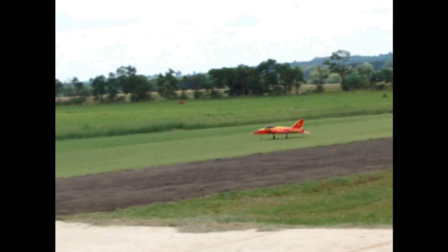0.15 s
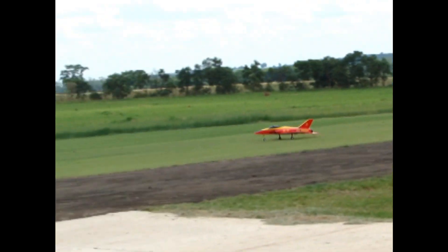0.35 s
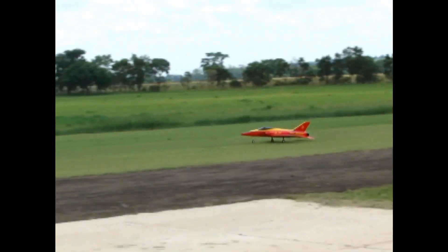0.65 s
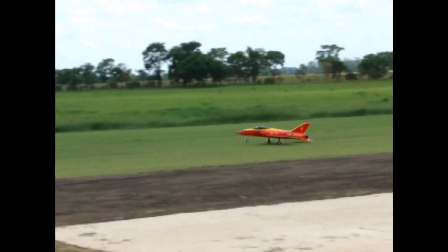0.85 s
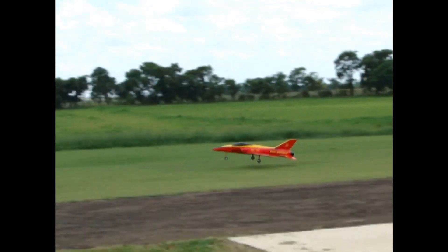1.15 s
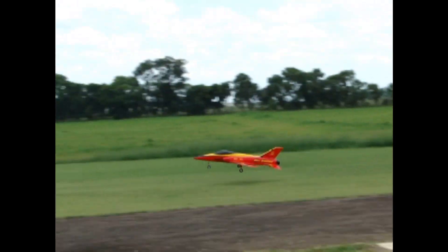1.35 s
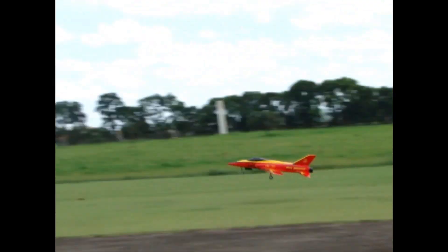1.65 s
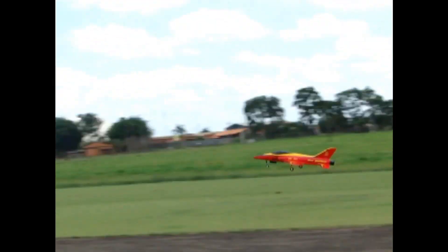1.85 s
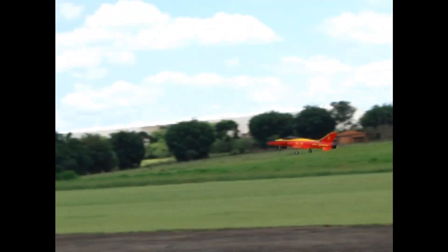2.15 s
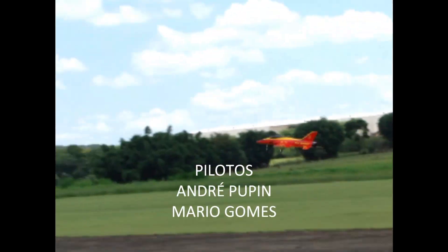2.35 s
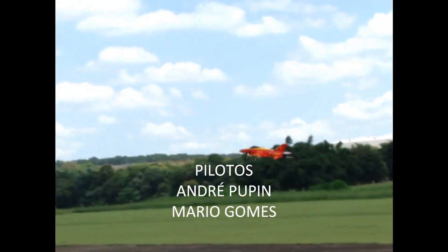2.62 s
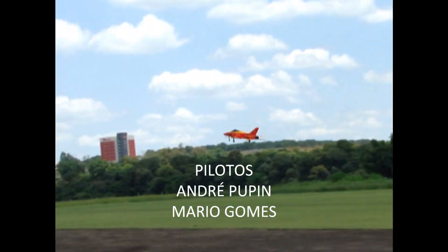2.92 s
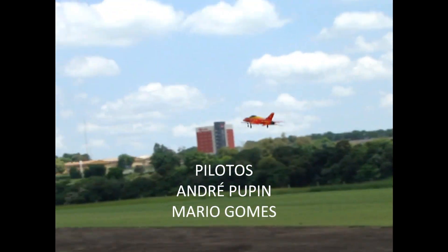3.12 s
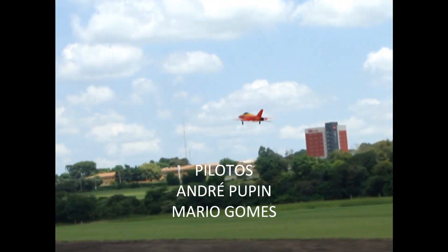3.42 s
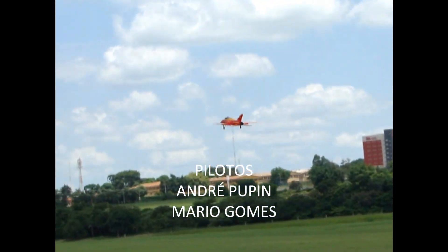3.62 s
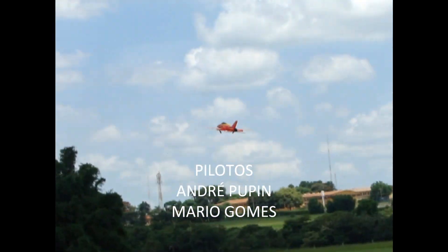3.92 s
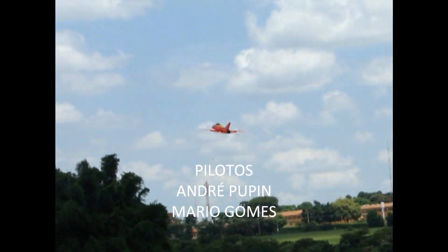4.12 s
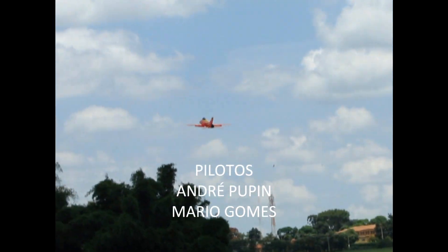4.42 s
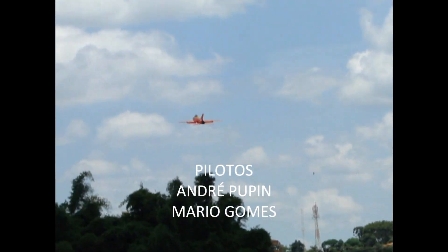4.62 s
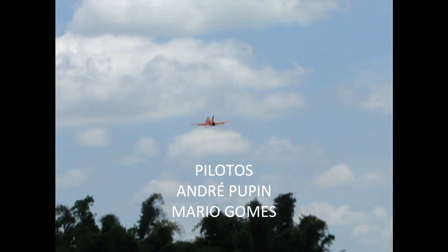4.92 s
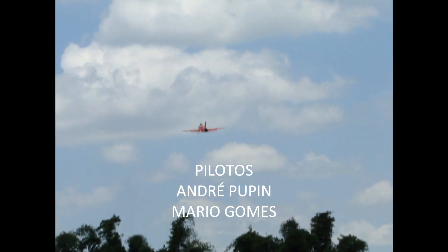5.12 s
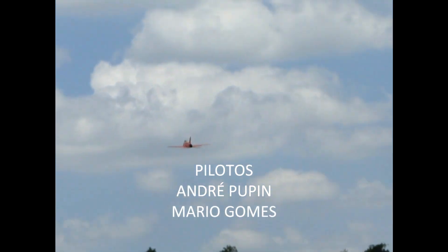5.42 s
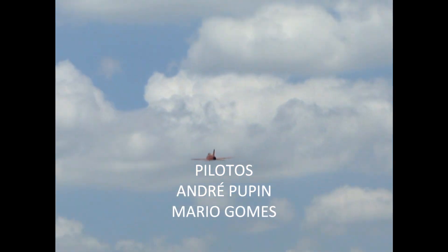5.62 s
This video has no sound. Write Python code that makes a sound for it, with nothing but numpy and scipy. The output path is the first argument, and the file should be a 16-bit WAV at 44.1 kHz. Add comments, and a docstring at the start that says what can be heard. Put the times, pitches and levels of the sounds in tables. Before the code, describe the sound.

A six-second outdoor flyby of a small model turbine jet, heard by a stereo microphone near a grass airstrip. From 0 to about 1 s, strong low wind flutters and thumps unevenly on the two sides, with short sharp puffs, over a restrained jet rush and a faint, very high whistle near 11.5 kHz, sliding slightly down. Around 1.1 s the whistle flares with tiny sizzles and the exhaust opens up: a surge of roar, midrange rush and bright hiss, passing closest near 1.5 s. The whistle is gone by about 1.5 s and the wind eases to a light breeze. From 2 to 4 s the broad, airy, flickering rush continues, coloured by shifting hollow, flanger-like sweeps from echoes. After 4 s it recedes, the top treble softening; from about 4.8 s a rough rumble around 500 Hz gathers and sinks, with small wind gusts after 5 s.

```python
"""On a grass strip, a model jet lifts off, passes a microphone pair some twenty metres away and climbs off.
Its exhaust is shaped noise that roars, rushes and hisses; the turbine's blade tone whistles on the approach,
with short sizzles of intake noise. Delayed copies off the grass and nearby surfaces sweep combs through
the jet, and a rumble gathers behind it. Low noise, mostly opposite at the two ports, is wind: strong at first,
then a light breeze with gusts near the end."""
import sys
import numpy as np
from scipy import signal
from scipy.io import wavfile
from scipy.ndimage import uniform_filter1d, map_coordinates

SR = 44100
rng = np.random.default_rng(int(sys.argv[2]) if len(sys.argv) > 2 else 0)


def int16_out(signal):
    """Quantize to a 16-bit WAV file."""
    q = np.round(np.clip(np.atleast_2d(signal).T, -1, 1) * 32767)
    wavfile.write(sys.argv[1], SR, q.astype(np.int16))


N = 254016
TIME = np.arange(N) / SR
# the noise is coloured in overlapping spectral frames, one every 256 samples
FRAME_S = np.arange(N // 256 + 5) * 256 / SR
BIN_HZ = np.fft.rfftfreq(1024, 1 / SR)

# colour of wind on the ports, before its pitch is scaled: (frequency [Hz], relative level [dB per Hz])
WIND_COLOUR = [(20, -56), (45, -35), (90, -23), (160, -2.5), (250, 4.5), (420, -0.5), (560, -8.5),
               (800, -17), (1200, -16.5), (2000, -46), (4000, -70)]


def exhaust():
    """Large eddies roar, the core of the stream rushes, the fine eddies at the nozzle hiss."""
    wander_db = 0.21 * drift(TIME, 2.02, 6)
    return roar() + (rush() + hiss()) * gain_of(wander_db)


def rush():
    """The core of the jet stream: mid-band turbulence that shifts in pitch and narrows in its strongest lobe."""
    # colour before the pitch factor: (frequency [Hz], from the side [dB per Hz], from behind [dB per Hz])
    rush_colour = [(490, -58, -75), (687, -17, -17.5), (870, -7, -4.5), (965, -6, -3), (1060, 2.1, 2),
                   (1377, 2.5, -3.5), (1524, -0.5, -14), (1620, -8, -13), (1980, -4, -11),
                   (2280, -6.5, -13.5), (2600, -5.5, -20), (2930, -5.5, -19), (3030, -9.5, -15),
                   (3070, -8.5, -21.5), (3220, -14, -21.5), (4870, -38, -47.5)]
    # wavering pitch of the rush, highest near 1.25 s: (time [s], pitch [factor])
    rush_pitch = [(0, 0.95), (.7, 0.92), (1.25, 0.99), (1.7, 0.95), (2.3, 0.96), (3, 0.93), (3.7, 0.955),
                  (4.5, 0.93), (5.76, 0.94)]
    # brightness as the plane turns: (time [s], tilt [dB per octave])
    rush_tilt = [(.6, 1), (1.05, 0.8), (1.3, 2), (1.6, 4.5), (1.9, 0.1), (2.25, 0.6), (2.8, 1.3), (3.3, -2),
                 (4, 0.1), (5.76, 3)]
    pitch, = curves(rush_pitch, FRAME_S[:, None])
    slope, = curves(rush_tilt, FRAME_S[:, None])
    # in the lobe the colour gains contrast
    focus = 1 + 0.23 * bump(FRAME_S[:, None], 2.42, 0.35)
    noise = jet_noise(rush_colour, BIN_HZ / pitch, turning(2.6, 4.3), patchy_db=1.2, flutter_db=0.25,
                      tilt_db=slope * np.log2(BIN_HZ + 1), contrast=focus)
    level_db = jet_level_db(abeam_db=-23, hidden_db=-8, tail_db=-5.5, beam_db=6)
    # extra flutter while the plane rolls, then a surge as the nozzle comes into view
    rolling_db = 1.2 * (1 - ramp(TIME, 0.85, 1.15)) * drift(TIME, 12, 70)
    surge_db = 1.2 * bump(TIME, 1.14, 0.052)
    return noise * gain_of(level_db + rolling_db + surge_db)


def hiss():
    """Fine eddies at the nozzle: treble turbulence, brighter or duller as the plane turns."""
    # colour: (frequency [Hz], from the side [dB per Hz], from behind [dB per Hz])
    hiss_colour = [(2360, -60, -54), (3150, -4.5, -0.5), (3450, -0.5, -1), (3770, 0.5, 1.8),
                   (4430, -5.5, -1), (4770, -3, -3), (5750, -2.5, -3.5), (6100, -0.2, -4), (6610, -9, -4.5),
                   (7280, -9, -11), (7670, -3, -12), (8170, -7, -9.5), (8750, -7, -14), (9250, -8, -10.5),
                   (9970, -3, -10.5), (10800, -11.5, -13.5), (11280, -15, -15.5), (12300, -19, -25),
                   (13300, -60, -60)]
    # brightness: (time [s], tilt [dB per octave])
    hiss_tilt = [(.6, -5.5), (1.1, -1.5), (1.6, -2.5), (2.2, 1.5), (2.65, -0.5), (4, 2), (4.9, 2.5),
                 (5.76, 0.5)]
    # brief swells and sags: (time [s], width [s], change [dB])
    swells = [(0.085, .07, 6), (.37, 0.082, 1.5), (1.125, .025, 3), (1.266, .03, 1), (1.47, 0.12, 2.3),
              (1.702, 0.03, 1.2), (1.872, 0.036, -2), (2.276, 0.43, 1.7), (3.508, .03, -1.8),
              (3.64, 0.04, 1.8), (3.946, .1, 1), (5.0, 0.21, 1.5)]
    slope, = curves(hiss_tilt, FRAME_S[:, None])
    noise = jet_noise(hiss_colour, BIN_HZ, turning(1.7, 3.66), patchy_db=1.42, flutter_db=0.86,
                      tilt_db=slope * np.log2(BIN_HZ + 1) + treble_db())
    level_db = jet_level_db(abeam_db=-27, hidden_db=-12, tail_db=-4.5, beam_db=2)
    return noise * gain_of(level_db + summed_db(swells))


def roar():
    """The large, slow eddies of the jet: low-pitched turbulence."""
    # colour: (frequency [Hz], from the side [dB per Hz], from behind [dB per Hz])
    roar_colour = [(20, -66, -57), (103, -24, -25), (170.5, -9, -14), (303, 1, 0), (364, 2, -3.5),
                   (516, 3.5, 3), (636, -5, -1.5), (830, -7.5, -4.5), (1230, -20, -55)]
    noise = jet_noise(roar_colour, BIN_HZ, turning(3.45, 4.9), patchy_db=0.4, flutter_db=0.5)
    return noise * gain_of(roar_level_db())


def roar_level_db():
    """The roar swells on the runway, hollows out as the plane lifts, fills again and grows behind the nozzle."""
    runway_db = 6.5 * bump(TIME, 1.14, 0.17)
    hollow_db = -8.5 * (ramp(TIME, 1.12, 1.83) - ramp(TIME, 2.36, 3.1))
    behind_db = 4.5 * ramp(TIME, 4.3, 4.9)
    return -34.5 + runway_db + hollow_db + behind_db


def jet_level_db(abeam_db, hidden_db, tail_db, beam_db):
    """Spreading loss with distance, plus hiding by the fuselage, the rearward beam and the quiet core tail-on."""
    # a straight, accelerating run past the microphone
    abeam_s, closest_m, speed_m_per_s, thrust_m_per_s2 = 1.45, 21.5, 19.1, 7.8
    t = TIME - abeam_s
    along_m = speed_m_per_s * t + .5 * thrust_m_per_s2 * t ** 2
    distance = np.hypot(along_m, closest_m) / closest_m  # 1 at the closest point
    hidden = 1 - ramp(TIME, 0.52, 1.25) ** 1.8  # the nozzle swings into view
    tail_on = ramp(TIME, 4.85, 5.93)
    # once past, the beam gains beam_db for each doubling of distance
    rearward_db = beam_db * np.log2(distance) * (t > 0)
    aimed_db = hidden_db * hidden + tail_db * tail_on + rearward_db
    return abeam_db - 20 * np.log10(distance) + aimed_db


def jet_noise(colours, hz, aft, patchy_db, flutter_db, tilt_db=0, contrast=1):
    """Turbulent noise that changes colour as the tail turns to the listener; uneven air makes it flutter."""
    # the microphone pair with the plane near and far:
    # (frequency [Hz], left over right [dB], coherence [0-1], left lead [rad])
    ports_near = [(150, 0.0, 0.9, 0.0), (400, -0.3, 0.92, 0.0), (700, -0.3, 0.7, 0.2),
                  (1050, 4.2, 0.94, 0.1), (1600, 1.8, 0.81, -0.3), (1800, 4.5, 0.27, 0.4),
                  (2080, 9.5, 0.5, -1.8), (2500, -3, 0.67, -2.1), (3300, -5.5, 0.72, -2.9),
                  (4300, -2, 0.25, -2.4), (5000, -4.5, 0.68, -0.5), (6100, -7, 0.67, -0.8),
                  (7000, -4.5, 0.4, -3.3), (7800, -8, 0.45, -3.9), (8700, -0.5, 0.55, -4.7),
                  (9200, 1, 0.45, -4.5), (9800, 10, 0.4, -1.6), (10700, 7, 0.6, -2), (11400, 0, 0.65, -1.4)]
    ports_far = [(150, 0.0, 0.9, 0.0), (400, -0.6, 0.92, 0.2), (700, 3.5, 0.85, 0.5),
                 (1050, 4.8, 0.95, 0.2), (1500, 5.7, 0.7, 0.2), (1800, 7.4, 0.81, 0.5),
                 (2080, 11.8, 0.36, 0.6), (2500, 4.5, 0.42, -3.3), (3300, 3, 0.55, -3.7),
                 (4200, -0.5, 0.7, -4.1), (5000, -4, 0.37, 0.3), (6100, -7.5, 0.38, 0.1),
                 (6700, -6, 0.45, -2.7), (7300, 1.5, 0.5, -3.9), (7700, 0, 0.45, -3.6),
                 (8200, -5.5, 0.48, -3.7), (8700, -1.5, 0.55, -4), (9200, 1, 0.5, -4.3),
                 (9800, 8.5, 0.35, -2.3), (10700, 9, 0.35, -1.3), (11400, 6, 0.3, -1.5)]
    side, behind = spectra(colours, hz)
    colour_db = contrast * ((1 - aft) * side + aft * behind) + tilt_db + ground_db()
    colour_db = colour_db + patchy_db * patches(frame_size=14, bin_size=12)
    far = turning(1.8, 3.73)
    ports = (1 - far) * spectra(ports_near, BIN_HZ)[:, None] + far * spectra(ports_far, BIN_HZ)[:, None]
    return noise_pair(colour_db, *ports) * gain_of(flutter_db * drift(TIME, 5, 35))


def treble_db():
    """The air dulls the top of the hiss as the plane draws away, and one band of it wavers."""
    # relative level of the band around 3.8 kHz: (time [s], change [dB])
    band_level = [(1.9, -5), (2.3, -1.5), (3, -2.5), (3.4, -1.5), (3.75, -1), (4.15, 1.5), (4.5, -4.5),
                  (5.76, -5)]
    t = FRAME_S[:, None]
    # from 3.8 s the loss grows by 3 dB a second at 10 kHz, and as frequency squared
    air_db = -3 * np.maximum(t - 3.8, 0) * (BIN_HZ / 10000) ** 2
    return air_db + curves(band_level, t)[0] * bump(BIN_HZ, 3800, 330)


def ground_db():
    """The grass turns the sound over as it bounces: a comb whose higher notches blur."""
    # the bounce falls behind as the plane climbs, and strengthens late, as the plane climbs away
    lag_ms = 0.12 + 0.77 * np.maximum(FRAME_S[:, None] - 1.808, 0)
    strength = np.minimum(0.24 + (0.87 - 0.24) * turning(3.9, 5.3), 0.85)
    cycles = BIN_HZ * lag_ms / 1000
    bounce = strength * np.exp(-(cycles / 1.26) ** 2)  # the blur sets in around 1.26 cycles of lag
    return 20 * np.log10(abs(1 - bounce * np.exp(-2j * np.pi * cycles)))


def reflections(x):
    """Two rough, dull echoes off surfaces; their lags shrink as the plane draws away and sweep a comb."""
    # each echo, before the facet shares: (time [s], lag [ms], level [dB])
    first_echo = [(0, 7, -30), (1.1, 9.5, -24), (1.5, 9.95, -13), (2.1, 9.4, -22), (3, 7.25, -16),
                  (3.7, 6.2, -9.5), (4.4, 5.2, -11), (5, 4.6, -14), (5.76, 4.2, -10)]
    second_echo = [(2.6, 9.2, -32), (3.2, 8.2, -16), (3.5, 7.65, -12), (3.9, 7.1, -18), (5, 6.2, -17),
                   (5.76, 5.8, -24)]
    # facets of each surface, some turning the sound over: (extra lag [ms], signed share [factor])
    facets = [(-.28, -.35), (0, .95), (.3, -.6), (.85, .3)]
    dull = signal.sosfiltfilt(signal.butter(1, 4800, fs=SR, output="sos"), x)
    out, power = x.copy(), 1
    for echo in (first_echo, second_echo):
        lag_ms, db = curves(echo, TIME)
        power = power + gain_of(db) ** 2
        for extra_ms, share in facets:
            heard_from = TIME - (lag_ms + extra_ms) / 1000
            out += share * gain_of(db) * np.array([np.interp(heard_from, TIME, port) for port in dull])
    return out / np.sqrt(power)


def near_echo(x):
    """A small surface beside the microphone throws the treble back, turned over: each port has its own comb."""
    # lag of the echo: (time [s], left port [ms], right port [ms])
    near_lags = [(2, 1.185, 1.125), (2.7, 1.217, 1.122), (3.4, 1.25, 1.138), (5.76, 1.255, 1.136)]
    # share of the treble thrown back: (time [s], left port [factor], right port [factor])
    near_shares = [(1.7, .03, .06), (2.2, .2, .32), (2.8, .2, .2), (3.4, .2, .14), (3.9, .07, .14),
                   (4.5, .18, .24), (5.76, .12, .26)]
    treble = signal.sosfiltfilt(signal.butter(2, 2100, "high", fs=SR, output="sos"), x)
    heard_from = (TIME - np.array(curves(near_lags, TIME)) / 1000) * SR  # in samples
    thrown_back = np.array([map_coordinates(port, [when], order=3) for port, when in zip(treble, heard_from)])
    return x - np.array(curves(near_shares, TIME)) * thrown_back


def rumble():
    """Heard from behind, the low noise gathers into one rough band that sinks in pitch."""
    # the departing rumble: (time [s], pitch [Hz], level before roughness [dB])
    rumble_path = [(4.3, 560, -70), (4.75, 540, -42), (5.15, 527, -33), (5.45, 490, -34.5),
                   (5.76, 442, -37)]
    hz, _ = curves(rumble_path, FRAME_S[:, None])
    _, level_db = curves(rumble_path, TIME)
    colour_db = -20 * np.log10(1 + ((BIN_HZ - hz) / 58) ** 2)  # 6 dB down 58 Hz off centre
    rough_db = 1.2 * drift(TIME, 19, 70)
    return noise_pair(colour_db, balance_db=-3, coherence=1.0, lead=0.25) * gain_of(level_db + rough_db)


def whistle():
    """The compressor's blade tone beams from the intake in a narrow fuzz of inflow noise, then fades steeply."""
    # centre of the wavering blade tone: (time [s], pitch [Hz])
    blade_pitch = [(0, 11612), (.45, 11565), (.87, 11497), (1.1, 11415), (1.3, 11335), (1.6, 11150)]
    hz = curves(blade_pitch, TIME)[0] + 10 * drift(TIME, 3.6, 155)
    level_db = blade_level_db() + 3.0 * drift(TIME, 9, 76.3)
    left_lead, fuzz, fuzz_width_hz = -1.55, 0.3, 200
    phase = 2 * np.pi * np.cumsum(hz) / SR + np.array([[left_lead], [0]])
    slow_noise = signal.lfilter(*signal.butter(2, fuzz_width_hz, fs=SR), rng.standard_normal((2, N)))
    along, across = evened(slow_noise)
    tone = np.sqrt(2) * np.sin(phase) + fuzz * (along * np.sin(phase) + across * np.cos(phase))
    return tone * gain_of(level_db) * gain_of([[1.0], [-1.0]])  # left, right [dB]


def blade_level_db():
    """The blade tone swells in the beam of the intake, flares with its lobes, and fades once that has passed."""
    # flares: (time [s], width [s], level [dB])
    flares = [(.035, .02, -39.5), (.89, .018, -39.5), (1.035, .012, -34.5), (1.1, .009, -28),
              (1.19, .012, -36), (1.213, .007, -30.5), (1.285, .012, -37.5)]
    beam_db = 11.8 * bump(TIME, 1.16, 0.135)
    fade_db = 127.5 * np.maximum(TIME - 1.26, 0)  # 127.5 dB a second
    steady = gain_of(-49.3 + beam_db - fade_db)
    return 20 * np.log10(np.hypot(steady, pulses(flares, TIME)))


def intake():
    """Air rushing into the compressor gives short sizzles around the blade tone."""
    # sizzles: (time [s], width [s], level [dB])
    sizzles = [(1.0, .009, -35.5), (1.105, 0.018, -33.5), (1.383, .014, -38), (1.455, .03, -38)]
    # a band at 11.3 kHz, 3 dB down 600 Hz off centre
    colour_db = -10 * np.log10(1 + ((BIN_HZ - 11300) / 600) ** 4) * np.ones((len(FRAME_S), 1))
    return noise_pair(colour_db, balance_db=2, coherence=0.6, lead=-0.71) * pulses(sizzles, TIME)


def wind():
    """Eddies push on the two ports in opposite senses; a weaker gust is also duller."""
    # the colour table holds as written at -26 dB and falls an octave for every 70 dB below
    pitch = 2 ** ((wind_level_db(FRAME_S[:, None]) + 26) / 70)
    colour_db = spectra(WIND_COLOUR, BIN_HZ / pitch)[0] + 4.0 * patches(frame_size=6, bin_size=6)
    level_db = wind_level_db(TIME) + 1.0 * drift(TIME, 4.5, 35)
    return noise_pair(colour_db, balance_db=3, coherence=-0.86, lead=0) * gain_of(level_db)


def wind_level_db(t):
    """A strong blow that dies away, a light breeze that builds, and gusts add in power."""
    # gusts: (time [s], width [s], level [dB])
    gusts = [(1.287, 0.052, -40), (1.72, 0.053, -50), (2.475, 0.07, -47), (3.6, 0.099, -46),
             (4.289, 0.27, -43.5), (4.752, 0.14, -43), (5.092, 0.052, -36), (5.51, 0.047, -33),
             (5.747, 0.04, -34)]
    blow = gain_of(-25.5 - 42 * np.maximum(t - 0.77, 0))  # fades 42 dB a second
    breeze = gain_of(-55 - 5.5 * np.maximum(3.1 - t, 0))  # builds 5.5 dB a second
    return 10 * np.log10(blow ** 2 + breeze ** 2 + pulses(gusts, t) ** 2)


def buffets():
    """Small fast eddies give short puffs on the ports, most of them brighter than the steady wind."""
    # single sharp buffets: (time [s], level [dB], pitch over the wind colour [factor])
    sharp_buffets = [(.19, -24.5, 1.2), (.375, -28, 1), (.592, -23, 1.15), (.68, -25, 1.9), (.84, -28, 1.2),
                     (.91, -29, 1.4), (1.09, -28, 1.5)]
    s, db, brighter = np.transpose(sharp_buffets)
    colour_db = spectra(WIND_COLOUR, BIN_HZ / np.interp(FRAME_S[:, None], s, brighter))[0]
    puffs = (gain_of(db) * bump(TIME[:, None], s, 0.0058)).sum(1)
    return noise_pair(colour_db, balance_db=4.0, coherence=-0.31, lead=0) * puffs


def noise_pair(colour_db, balance_db, coherence, lead):
    """Two partly alike noises of steady power whose colour changes from frame to frame."""
    a, b, c, d = rng.standard_normal((4, len(FRAME_S), len(BIN_HZ)))
    same = np.clip(coherence, -1, 1)
    left = a + 1j * b
    right = same * left * np.exp(-1j * lead) + np.sqrt(1 - same ** 2) * (c + 1j * d)
    ratio, size = gain_of(balance_db), gain_of(colour_db)
    # colour sets only the shape: every frame is scaled to the same power
    size = size / np.linalg.norm(size, axis=1, keepdims=True) / np.sqrt(1 + ratio ** 2)
    frames = np.array([left * ratio, right]) * size
    return evened(signal.istft(frames.transpose(0, 2, 1), nperseg=1024, noverlap=768)[1][:, :N])


def patches(frame_size, bin_size):
    """A smooth random field of rms 1 over time and frequency."""
    field = rng.standard_normal((len(FRAME_S), len(BIN_HZ)))
    return evened(uniform_filter1d(uniform_filter1d(field, frame_size, 0), bin_size, 1))


def drift(t, low_hz, high_hz):
    """Irregular wavering of rms 1: thirty sines of random phase between two rates, the slow ones larger."""
    rates_hz = np.geomspace(low_hz, high_hz, 30)
    return evened(sum(np.sin(2 * np.pi * (f * t + rng.random())) / np.sqrt(f) for f in rates_hz))


def pulses(rows, t):
    """Amplitude of bell-shaped pulses given by time, width and level in dB."""
    return sum(gain_of(db) * bump(t, s, width) for s, width, db in rows)


def summed_db(rows):
    """Brief bell-shaped level changes in dB, added up."""
    return sum(db * bump(TIME, s, width) for s, width, db in rows)


def bump(t, centre, width):
    """A bell of height 1; the width is its standard deviation."""
    return np.exp(-.5 * ((t - centre) / width) ** 2)


def ramp(t, start, end):
    """Goes from 0 to 1 between two times."""
    return np.clip((t - start) / (end - start), 0, 1)


def turning(start, end):
    """Goes from 0 to 1 between two times, one value a frame."""
    return ramp(FRAME_S[:, None], start, end)


def curves(rows, t):
    """The columns of a time table at the times t."""
    s, *columns = np.transpose(rows)
    return [np.interp(t, s, c) for c in columns]


def spectra(rows, hz):
    """The columns of a frequency table, joined on a log axis."""
    f, *columns = np.transpose(rows)
    return np.array([np.interp(np.log(hz + 1), np.log(f + 1), c) for c in columns])


def gain_of(db):
    """Decibels to amplitude."""
    return 10 ** (np.asarray(db) / 20)


def evened(x):
    """Scales to rms 1."""
    return x / np.sqrt(np.mean(x ** 2) + 1e-20)


def scene():
    """The plane with its echoes, and the wind at the microphone; the whole level dips briefly a few times."""
    # dips: (time [s], width [s], change [dB])
    dips = [(0.563, 0.026, -2.5), (2.62, 0.13, -0.5), (3.516, 0.018, -2)]
    jet = near_echo(reflections(exhaust()))
    plane = jet + rumble() + whistle() + intake()
    return (plane + wind() + buffets()) * gain_of(summed_db(dips))


def record(dry):
    """The microphone's low cut at 30 Hz and band limit at 12 kHz."""
    lean = signal.sosfilt(signal.butter(2, 30, "high", fs=SR, output="sos"), dry)
    taps = signal.firwin(401, 12000, window=("kaiser", 9), fs=SR)
    return signal.oaconvolve(lean, taps[None], "same")


dry = scene()
out = record(dry)
int16_out(out)
```